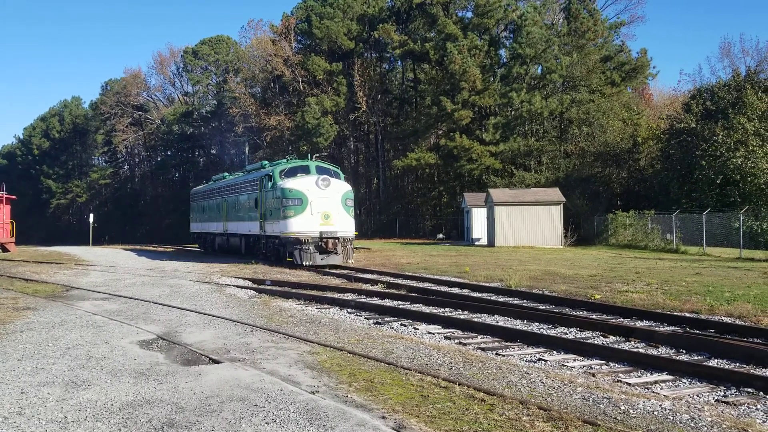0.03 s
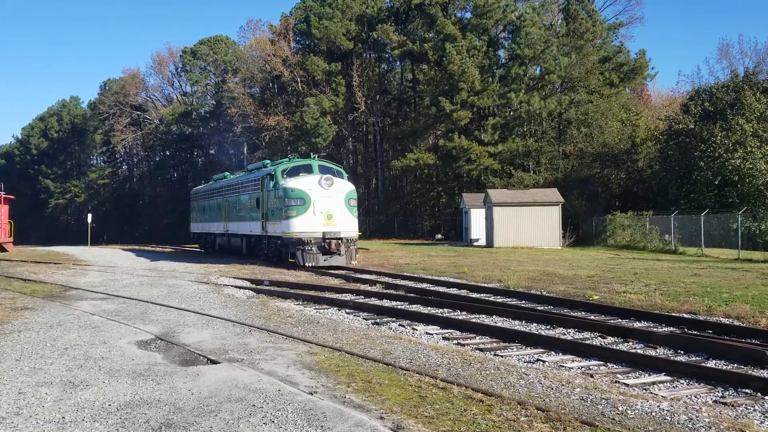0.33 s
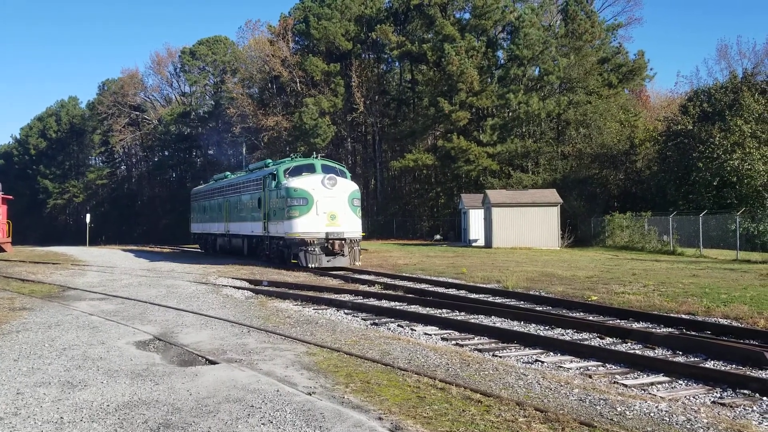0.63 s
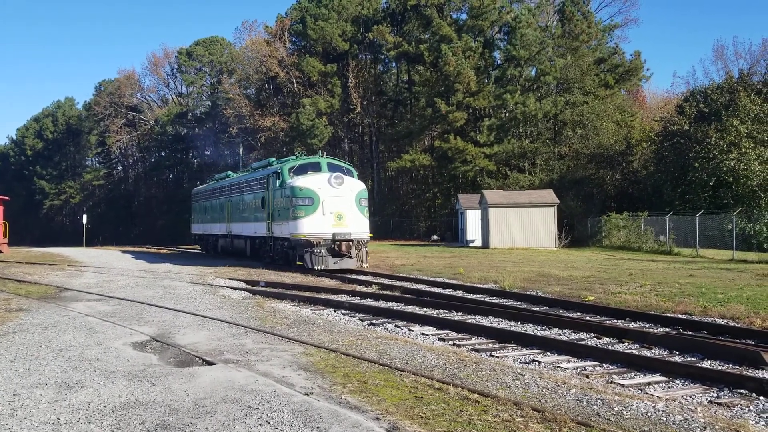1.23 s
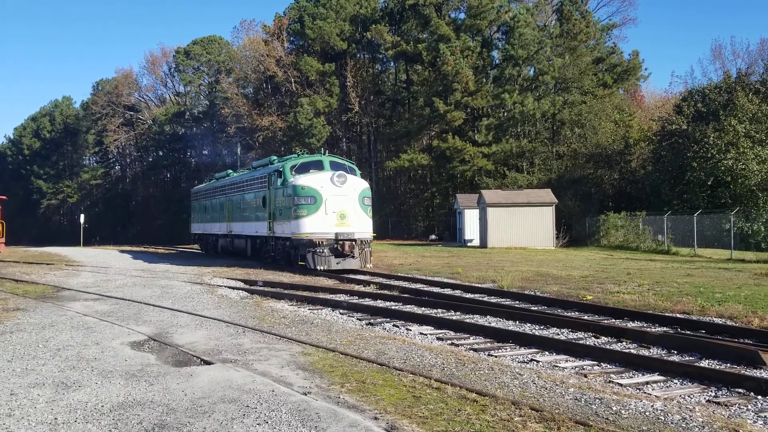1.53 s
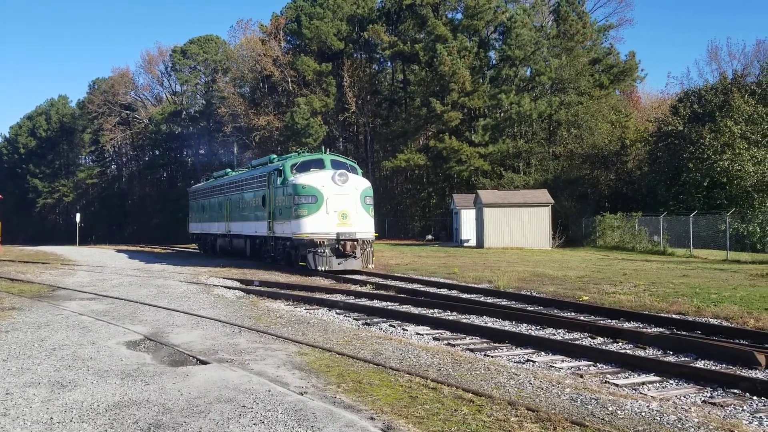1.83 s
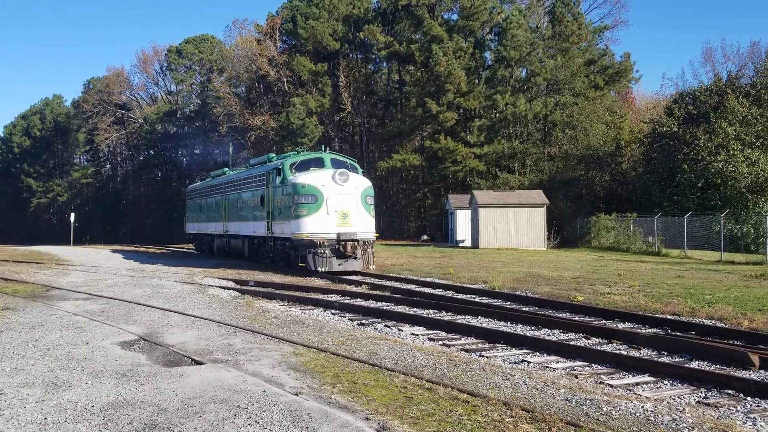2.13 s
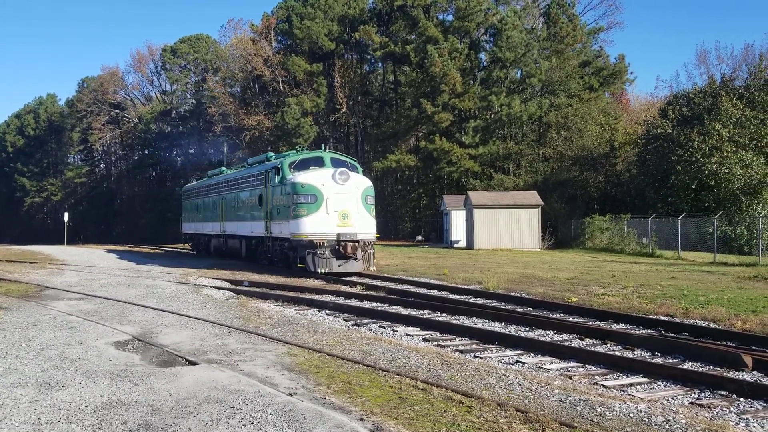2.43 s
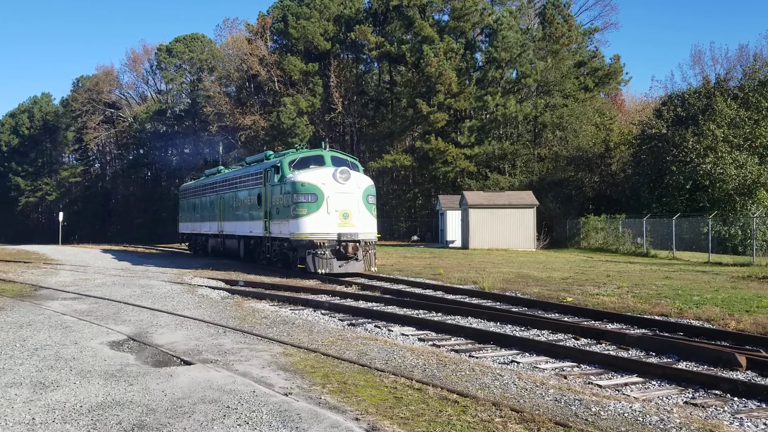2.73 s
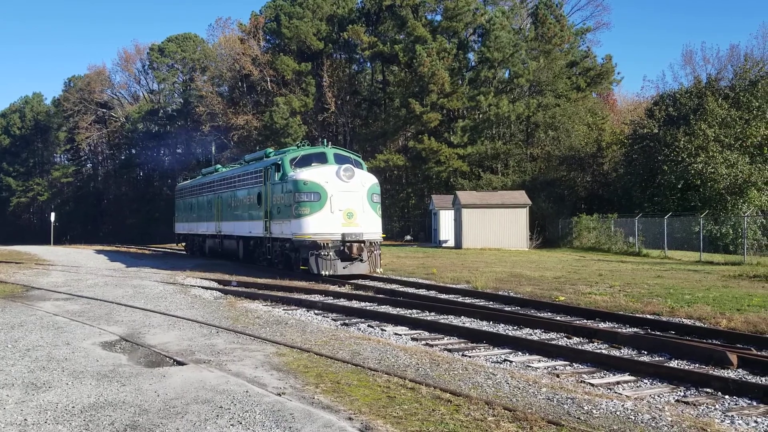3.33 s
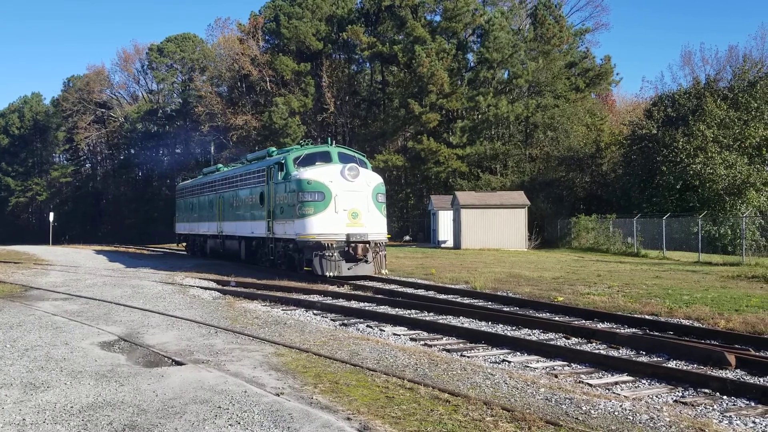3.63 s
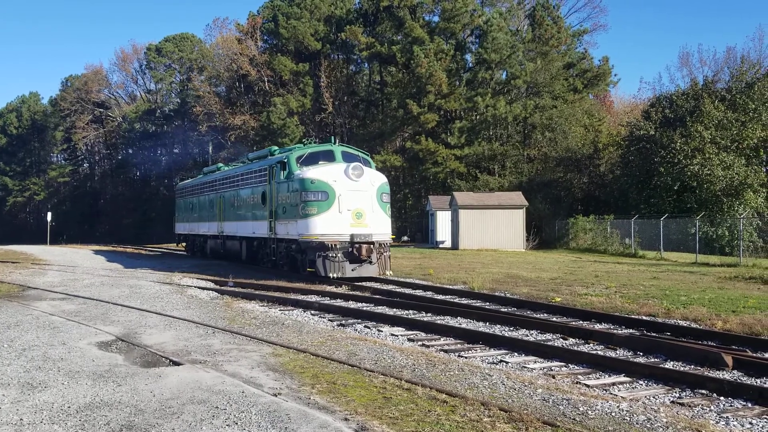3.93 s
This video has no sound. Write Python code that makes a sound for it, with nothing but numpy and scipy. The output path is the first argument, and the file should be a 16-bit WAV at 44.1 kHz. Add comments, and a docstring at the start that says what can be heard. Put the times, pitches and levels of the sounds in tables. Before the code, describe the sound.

Low, throbbing diesel locomotive engine with a steadily clanging bell outdoors.

```python
"""A diesel locomotive creeps along an outdoor track at idle, its bell struck about once a second.
The exhaust throbs with engine tones and firing puffs under the rush of fans and machinery.
The clapper sets the bell's modes ringing, and the trees scatter the ring.
The pickup is a pair of microphone ports, the right hearing everything about half a millisecond later;
close to them a faint dry crackle comes and goes."""
import sys
import numpy as np
from scipy import signal
from scipy.fft import rfft, irfft
from scipy.io import wavfile

SR = 44100
rng = np.random.default_rng(int(sys.argv[2]) if len(sys.argv) > 2 else 0)


def file_out(sig):
    """Save sig as 16-bit WAV at sys.argv[1]."""
    # one column per channel
    cols = np.atleast_2d(sig).T
    # limit, then scale
    lim = np.clip(cols, -1, 1)
    pcm = np.round(lim * 32767).astype(np.int16)
    wavfile.write(sys.argv[1], SR, pcm)


N = 176400
CRANK_HZ, CYLINDERS = 3.91, 16

# strokes of the clapper (time [s], drive of the low modes [dB], of the high modes and clank [dB])
BELL_STROKES = [(0.103, -27, -31), (1.039, -30, -33), (1.973, -27, -38), (2.908, -25, -31.5),
                (3.835, -24.5, -28)]


def amp(db):
    """Decibels to gain."""
    return 10 ** (np.asarray(db) / 20)


def unit(x):
    """Scales to rms 1."""
    return x / np.sqrt(np.mean(abs(x) ** 2) + 1e-20)


def spectrum(points):
    """Reads a table over frequency at every bin."""
    hz, value = np.transpose(points)
    return np.interp(np.log(np.fft.rfftfreq(N, 1 / SR) + 1), np.log(hz), value)


def curve(points):
    """Reads a table over time at every sample."""
    return np.interp(np.arange(N) / SR, *np.transpose(points))


def drift(rate_hz):
    """Smooth random wander of rms 1."""
    lowpass = np.exp(-.5 * (np.fft.rfftfreq(N, 1 / SR) / rate_hz) ** 2)
    return unit(irfft(rfft(rng.standard_normal(N)) * lowpass, N))


def add(mix, s, sound):
    """Mixes a sound in at s seconds."""
    part = mix[..., max(round(s * SR), 0):][..., :sound.shape[-1]]
    part += sound[..., :part.shape[-1]]


def noise_pair(colour, envelope=1):
    """Two unrelated noises, modulated and then coloured, at rms 1."""
    white = rng.standard_normal((2, N))
    return unit(irfft(rfft(white * envelope) * amp(spectrum(colour)), N))


def port_lag(hz):
    """Seconds by which sound reaches the right port after the left."""
    # lag of the right port (frequency [Hz], delay [s])
    right_lag = [(500, .00038), (800, .00036), (1170, .00043), (1650, .00046), (1900, .00044),
                 (2400, .00047), (2750, .00046), (3200, .00044), (3500, .0005), (4130, .00049),
                 (15000, .00051)]
    return np.interp(hz, *np.transpose(right_lag))


def ports(pair):
    """Two unrelated signals become left and right: partly alike, the right later and mostly softer."""
    # right port against the left (frequency [Hz], gain [dB])
    right_gain = [(60, -6.5), (500, -8), (830, -3), (1170, -10.5), (1450, -5), (1800, -4.5), (2300, 2.5),
                  (2800, -6), (4100, 3.5), (5200, 0.5), (6300, -8.5), (7000, -9), (7600, -9.5),
                  (9800, -11.5), (11600, 0), (13500, -6.5), (15800, -29)]
    # likeness of the ports (frequency [Hz], coherence [0-1])
    likeness = [(60, 0.8), (300, 0.92), (800, 0.95), (1500, 1), (2500, 0), (4200, 0.6), (7000, 0.52),
                (15000, 0)]
    (left, unrelated), hz = rfft(pair), np.fft.rfftfreq(N, 1 / SR)
    same = np.clip(spectrum(likeness), 0, 1)
    delay = np.exp(-2j * np.pi * hz * port_lag(hz))
    right = delay * (same * left + np.sqrt(1 - same ** 2) * unrelated) * amp(spectrum(right_gain))
    return irfft(np.array([left, right]), N)


def exhaust(turns):
    """Beating engine tones swell and sink over an uneven puff for every firing and a steady rumble."""
    # exhaust tones (multiple of the crank speed, level before the throb [dB])
    orders = [(8, -48), (12, -42), (14.15, -35), (16, -26.3), (17.15, -36), (20, -32), (21.4, -41),
              (27, -42)]
    # throb of those tones (time [s], swing before scaling by throb_depth [dB])
    throb = [(0, 4), (.25, -3), (.31, 4.5), (.5, 3.5), (.63, -1.5), (.7, 5), (.77, 2.5), (.93, 1),
             (1.02, 5.5), (1.22, 5.5), (1.29, -6.5), (1.4, 6.5), (1.46, -5), (1.54, 4), (1.64, 4.5),
             (1.7, -2), (1.87, -0.5), (1.99, 9), (2.06, 2), (2.11, -17), (2.17, 7), (2.24, 8), (2.28, -5),
             (2.4, 4), (2.46, 6), (2.52, 11), (2.56, -18), (2.62, 1.5), (2.75, 1.5), (2.82, -5),
             (2.89, 5.5), (2.97, -3), (3.07, 7.5), (3.2, 5), (3.25, -4.5), (3.4, -7), (3.46, 4),
             (3.69, 5.5), (3.78, -6), (3.84, 6), (3.92, -21), (3.98, 6)]
    # colour of the engine's rumble (frequency [Hz], relative level [dB])
    rumble_colour = [(10, -49), (24, -18), (31, 7), (37, -30), (46, -2), (64, -14), (88, 2), (115, -7.5),
                     (160, -11.5), (250, -22.5), (500, -50), (1000, -83)]
    throb_depth, rumble_db = .8, -29.5
    puff_db, puff_hz, puff_s, uneven_db = -35, 85, .005, 4
    tones = sum(np.sqrt(2) * amp(db) * np.cos(2 * np.pi * (k * turns + rng.random())) for k, db in orders)
    firings = np.diff(np.floor(turns * CYLINDERS), prepend=0)
    firings *= amp(uneven_db * np.clip(rng.standard_normal(N), -2, 2))
    t = np.arange(SR // 10) / SR
    puff = np.exp(-t / puff_s) * t * np.cos(2 * np.pi * puff_hz * t)
    puffs = amp(puff_db) * unit(signal.fftconvolve(firings - firings.mean(), puff)[:N])
    bass = amp(rumble_db) * noise_pair(rumble_colour)
    bass[0] += tones * amp(throb_depth * curve(throb)) + puffs
    return ports(bass)


def wavering(cycles, depth=.51, rate_hz=4.5):
    """A tone of rms 1 whose strength and phase wander."""
    wander = 1 + depth * (drift(rate_hz) + 1j * drift(rate_hz))
    return unit((wander * np.exp(2j * np.pi * cycles)).real)


def machinery(turns):
    """Fans and gear rush, pulsing a little with the firings; a drone, a hum and whines stand out."""
    # colour of the rush (frequency [Hz], relative level [dB])
    rush_colour = [(60, 5.5), (200, 0), (300, 2), (480, 0), (650, 3.5), (830, -0.5), (920, -2.5),
                   (1250, -3.5), (1450, -0.5), (1600, -6), (1850, -8.5), (2300, -7), (2800, -9.5),
                   (3400, -16), (4100, -21), (5000, -24), (6200, -29.5), (6550, -32.5), (7000, -31.5),
                   (7500, -31), (8500, -33.5), (10000, -30), (12000, -35), (15800, -27)]
    # loudness of the rush (time [s], level [dB])
    rush_level = [(0, -30.5), (1, -29), (2, -29.5), (3, -29), (4, -29)]
    # drone of the engine's casing (frequency [Hz], relative level [dB])
    drone_colour = [(60, -25), (95, -3.5), (140, -5), (190, -9.5), (240, -10), (300, -25), (600, -58.5)]
    # loudness of the drone (time [s], level [dB])
    drone_level = [(0, -34.5), (1.3, -35), (2.3, -44.5), (4, -43)]
    # the engine's hum (time [s], level [dB])
    hum_level = [(0, -42.5), (1.3, -37.5), (2, -49), (4, -52)]
    # wavering machinery whines (frequency [Hz])
    whine_hz = [183, 377, 475, 612, 690, 795, 846]
    # the same whines (level [dB])
    whine_db = [-45.5, -50, -59, -49, -52.5, -58, -53]
    clatter_depth, flutter_db, hum_order = .067, 1.12, 60
    firing_phase = 2 * np.pi * CYLINDERS * turns
    clatter = 1 + clatter_depth * (np.cos(firing_phase) + np.cos(firing_phase / 2)) / 2
    flutter = amp(flutter_db * drift(rate_hz=75))
    mix = amp(curve(rush_level)) * noise_pair(rush_colour, clatter * flutter)
    mix += amp(curve(drone_level)) * noise_pair(drone_colour)
    mix[0] += amp(curve(hum_level)) * wavering(hum_order * turns)
    for hz, db in zip(whine_hz, whine_db):
        mix[0] += amp(db) * wavering(hz * np.arange(N) / SR)
    return ports(mix)


def grain_power(per_s=500, spread_db=7.5, decay_s=.0062):
    """Power of a stream of short grains of uneven size, mean 1."""
    onsets = rng.random(N) < per_s / SR
    grains = onsets * amp(spread_db * np.minimum(rng.exponential(1, N), 4))
    power = signal.lfilter([1], [1, -np.exp(-2 / (decay_s * SR))], grains ** 2)
    return power / power.mean()


def crackle():
    """Close to the ports: clumps of tiny bright grains, most in one band only, and a few louder ticks."""
    # colour of the grains (frequency [Hz], relative level [dB])
    grain_colour = [(1000, -23), (5000, -7), (7000, -3), (9300, -8), (9900, 3.5), (10700, 0), (11300, -7),
                    (12000, -1), (12900, -8), (14200, -2), (14700, 5), (15600, 0.5)]
    # bands that crackle separately (edge [Hz])
    band_edges = [0, 9300, 11200, 13400, 22050]
    # coming and going of the grains (time [s], level [dB])
    grain_level = [(0, -54), (.28, -60), (.38, -48), (.53, -60), (.65, -47), (.78, -56), (.9, -45),
                   (1.1, -70), (1.35, -49.5), (1.5, -70), (1.8, -50), (2.07, -54), (2.27, -59), (2.55, -52),
                   (3.03, -48.5), (3.2, -70), (3.4, -50), (3.72, -57), (3.82, -48.5), (4, -49)]
    # louder ticks (time [s], level before tick_boost_db [dB])
    ticks = [(0.3491, -47), (0.622, -43), (0.6494, -46), (0.6624, -41), (0.7238, -45), (0.8939, -44),
             (0.977, -48), (1.7624, -48), (1.9011, -46), (2.0702, -45), (2.7292, -49), (2.7786, -49),
             (3.038, -45), (3.3495, -47)]
    # colour of the ticks (frequency [Hz], relative level [dB])
    tick_colour = [(3000, -25), (8800, -17), (10100, -1), (11000, -3), (12000, 0), (13000, -7), (14200, 4),
                   (15800, 1)]
    shared, tick_decay_s, tick_boost_db = .33, .005, 7
    hz, t = np.fft.rfftfreq(N, 1 / SR), np.arange(SR // 20) / SR
    hiss, common_power = rfft(noise_pair(grain_colour)), grain_power()
    grains, tick_envelope = np.zeros((2, N)), np.zeros(N)
    for lo, hi in zip(band_edges, band_edges[1:]):
        power = shared * common_power + (1 - shared) * grain_power()
        grains += irfft(hiss * (hz >= lo) * (hz < hi), N) * np.sqrt(power)
    for s, db in ticks:
        add(tick_envelope, s, amp(db + tick_boost_db) * np.exp(-t / tick_decay_s))
    return ports(grains * amp(curve(grain_level)) + tick_envelope * noise_pair(tick_colour))


def clapper(gain_db=-7, hz=3300, decay_s=.014):
    """The clapper hits the bell with a short, noisy clank."""
    out, t = np.zeros((2, N)), np.arange(int(1.5 * SR)) / SR
    band = signal.butter(2, [hz * .73, hz * 1.1], "band", fs=SR)
    for s, _, high_db in BELL_STROKES:
        clank = unit(signal.lfilter(*band, rng.standard_normal((2, len(t)))))
        add(out, s, amp(high_db + gain_db) * np.exp(-t / decay_s) * clank)
    return out


def bell():
    """Each stroke sets the modes ringing; echoes scattered by the trees make each mode flutter."""
    # the bell's modes (frequency [Hz])
    mode_hz = [1427, 1655.5, 2740, 3527, 3890, 4113.5, 4222, 5691, 7386, 9200, 11440]
    # the same modes (left gain [dB], right gain [dB], t60 [s], attack [s], echo to direct [ratio])
    modes = [(-11.5, -16, 3, .005, .5), (1, -7.5, 1.9, .004, .35), (-4, -8.5, .7, .012, .6),
             (-4, -9, .17, .002, .3), (-22, -19, .4, .003, .5), (-5.5, -4.5, .9, .005, .7),
             (-22, -18, .6, .004, .6), (-20, -27, .55, .002, .4), (-23, -31, .25, .002, .4),
             (-30, -37, .25, .002, .5), (-38, -33, .3, .002, .5)]
    high_above_hz, scatter_hz, scatter_build_s = 3200, 18, .01
    out, t = np.zeros((2, N)), np.arange(int(1.5 * SR)) / SR
    echo_build = 1 - np.exp(-t / scatter_build_s)
    for hz, (left_db, right_db, t60, attack_s, wet) in zip(mode_hz, modes):
        lag = np.array([[0], [port_lag(hz)]])
        envelope = amp([[left_db], [right_db]]) * (1 - np.exp(-t / attack_s)) * amp(-60 * t / t60)
        ring = envelope * np.exp(2j * np.pi * hz * (t - lag))
        echoes = np.array([drift(scatter_hz) + 1j * drift(scatter_hz) for _ in range(2)]) / np.sqrt(2)
        for s, low_db, high_db in BELL_STROKES:
            drive = amp(high_db if hz > high_above_hz else low_db)
            scatter = wet * echo_build * np.roll(echoes, -round(s * SR), 1)[:, :len(t)]
            add(out, s, drive * (ring * (1 + scatter)).real)
    return out


def scene():
    """One crankshaft drives exhaust and machinery; the bell rings above them, the crackle sits close."""
    crank_hz = CRANK_HZ * (1 + .004 * drift(rate_hz=2.1))  # the idle wanders slightly
    turns = np.cumsum(crank_hz) / SR
    return exhaust(turns) + machinery(turns) + bell() + clapper() + crackle()


def record(dry):
    """The recorder cuts the deepest bass and the highest treble."""
    low_cut_hz, high_cut_hz = 35, 15850
    low_cut = signal.butter(4, low_cut_hz, "high", fs=SR, output="sos")
    high_cut = signal.firwin(801, high_cut_hz, window=("kaiser", 9), fs=SR)
    return signal.oaconvolve(signal.sosfilt(low_cut, dry), high_cut[None], "same")


dry = scene()
out = record(dry)
file_out(out)
```